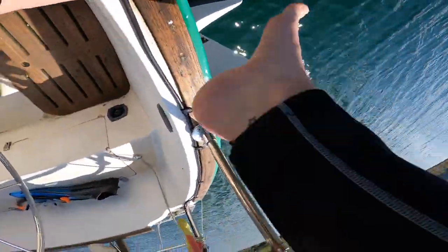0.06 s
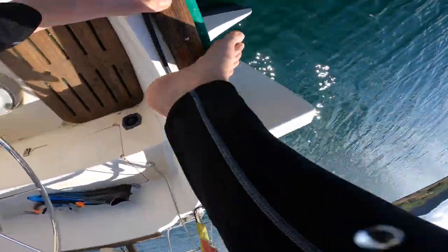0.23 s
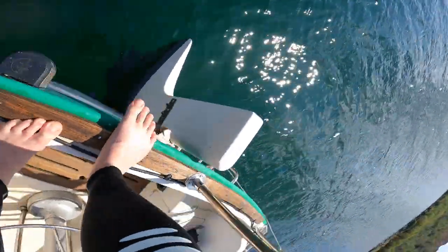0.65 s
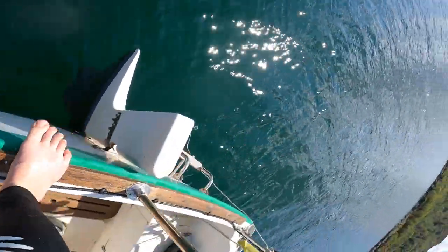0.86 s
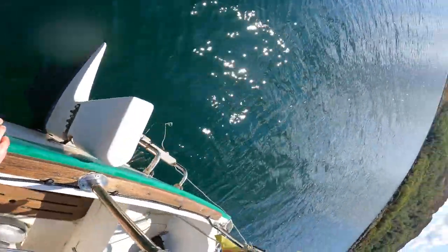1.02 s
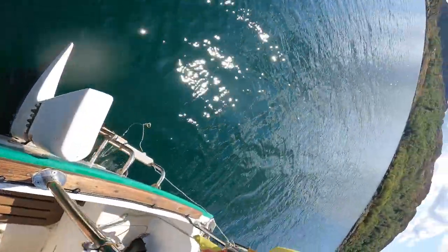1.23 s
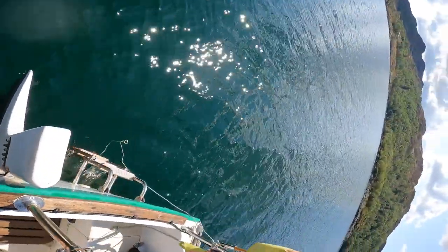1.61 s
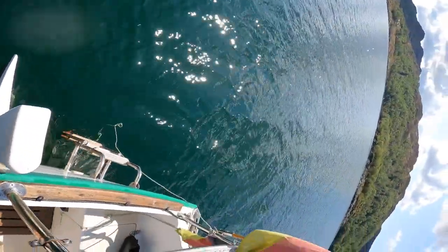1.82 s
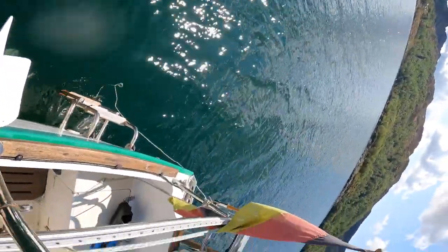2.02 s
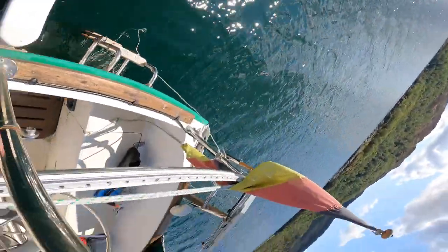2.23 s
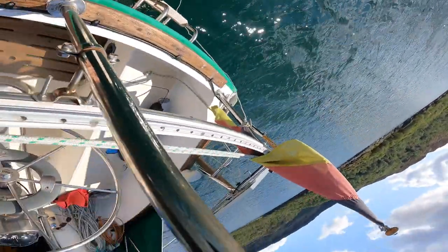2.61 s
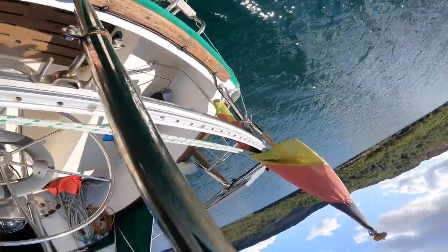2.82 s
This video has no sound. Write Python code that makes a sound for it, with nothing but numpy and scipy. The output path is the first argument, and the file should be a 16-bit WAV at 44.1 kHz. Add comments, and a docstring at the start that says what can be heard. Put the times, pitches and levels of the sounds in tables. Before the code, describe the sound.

Wind buffets the microphone after a bare foot slides and thumps on a sailboat's rail.

```python
"""Something slides with a hiss on the stern of a small sailboat; a bare foot thumps the rail and
judders along it by stick-slip friction. Fittings click and creak under the load, ringing in their
natural modes, and water washes softly along the hull with swells of airy hiss. Then turbulent
gusts buffet the microphone with a low rumble, while small metal hardware rubs and rings thinly."""
import sys
import numpy as np
from scipy import signal
from scipy.fft import rfft, irfft
from scipy.io import wavfile

SR = 44100
rng = np.random.default_rng(int(sys.argv[2]) if len(sys.argv) > 2 else 0)


def generate_wav(sig):
    """Save sig (samples, or channels by samples) to the path in sys.argv[1] as 16-bit PCM at SR."""
    pcm = np.round(np.clip(np.atleast_2d(sig).T, -1, 1) * 32767).astype(np.int16)
    wavfile.write(sys.argv[1], SR, pcm)


N = 130095
T = np.arange(N) / SR


def amp(db):
    """Decibels to amplitude gain."""
    return 10 ** (np.asarray(db) / 20)


def unit(x):
    """Normalisation to an rms of one."""
    return x / np.sqrt(np.mean(x ** 2) + 1e-20)


def curve(points):
    """Linear interpolation of (seconds, value) points over the whole scene."""
    return np.interp(T, *np.transpose(points))


def colour(x, points):
    """Spectral shaping by (Hz, dB) points, to an rms of one."""
    hz, db = np.transpose(points)
    f = np.fft.rfftfreq(x.shape[-1], 1 / SR)
    gain = amp(np.interp(np.log(f + 1), np.log(hz + 1), db))
    return unit(irfft(rfft(x) * gain, x.shape[-1]))


def drift(rate_hz):
    """Random modulation: low-passed noise with an rms of one."""
    f = np.fft.rfftfreq(N, 1 / SR)
    return unit(irfft(rfft(rng.standard_normal(N)) / (1 + (f / rate_hz) ** 4), N))


def stereo_noise(correlation):
    """Sum and difference of two white noises set the correlation of left and right."""
    mid, side = rng.standard_normal((2, N))
    return np.sqrt((1 + correlation) / 2) * mid + np.sqrt((1 - correlation) / 2) * np.array([side, -side])


def pan(db):
    """Channel gains for a left-over-right level difference."""
    return amp([[db / 2], [-db / 2]])


def add(mix, start_s, sound):
    """Superposition of a sound on the mix from a given time."""
    part = mix[:, max(round(start_s * SR), 0):][:, :sound.shape[-1]]
    part += sound[..., :part.shape[-1]]


def ring(modes):
    """Free vibration: damped sines from (Hz, dB, t60) rows; t60 is the time to fall 60 dB."""
    t = T[:SR // 2]
    return sum(amp(db) * np.exp(-np.log(1000) * t / t60) * np.sin(2 * np.pi * hz * t)
               for hz, db, t60 in modes)


def resonate(x, hz, width_hz):
    """Forced vibration of a steep, double-pole resonance, to an rms of one."""
    carrier = np.exp(2j * np.pi * np.cumsum(np.full(len(x), hz)) / SR)
    pole = np.exp(-np.pi * width_hz / SR)
    return unit((carrier * signal.lfilter([1], [1, -2 * pole, pole ** 2], x / carrier)).real)


def micro_slips(n, per_s, spread_db, max_spreads):
    """Rough friction as a Poisson process: impulses of random time, sign and strength."""
    impulses = (rng.random(n) < per_s / SR) * rng.choice([-1, 1], n)
    return impulses * amp(spread_db * np.minimum(rng.exponential(1, n), max_spreads))


# Blows of the foot. Each row: start in seconds, level in dB, pitch in Hz, crack level in dB, pan in dB.
FOOT_BLOWS = [(.226, -17.5, 267, -18.5, -14), (.2335, -4.5, 130, -45, -8), (0.265, -8, 223, -11, 7),
              (0.276, -14, 90, -25.5, 3), (0.3071, -16.5, 204, -13, -14)]
# Spectrum of the contact crack. Each row: frequency in Hz, relative level in dB.
CRACK_SPECTRUM = [(100, -0.5), (400, 0), (880, -7), (1200, -23), (3500, -23.5), (8000, -49.5), (16000, -75)]


def foot_thumps(body_rise_s=0.0029, body_t60_s=0.04, crack_rise_s=0.0011, crack_t60_s=0.013):
    """Soft impact: each blow on the rail excites a low, heavily damped mode under a dull crack."""
    out, t = np.zeros((2, N)), T[:SR // 2]
    for start_s, db, hz, crack_db, pan_db in FOOT_BLOWS:
        body = ring([(hz, db, body_t60_s)]) * (1 - np.exp(-t / body_rise_s))
        envelope = (1 - np.exp(-(t / crack_rise_s) ** 2)) * np.exp(-np.log(1000) * t / crack_t60_s)
        noise = colour(stereo_noise(correlation=0.33), CRACK_SPECTRUM)[:, :len(t)]
        crack = noise * amp(crack_db) * envelope
        add(out, start_s, pan(pan_db) * (crack - body))
    return out


# Modes of the rail. Each row: frequency in Hz, relative level in dB, t60 in seconds.
RAIL_MODES = [(62, 1, 0.043), (137, 3, 0.048), (228, -24, .035), (285, -15.5, 0.025)]


def foot_judder(start_s=0.312, length_s=0.088, slip_s=0.0036, force_db=-13, fade_db=-32.5):
    """Stick-slip friction: quickening, fading slips of soft skin drive the modes of the rail."""
    t = T[:round(length_s * SR)]
    slip_rate_hz = np.minimum(58.7 + 410 * t, 73)
    slips = np.diff(np.floor(np.cumsum(slip_rate_hz) / SR), prepend=-1)
    strength = amp(force_db + fade_db * (t / length_s) ** 2)
    push = np.hanning(round(slip_s * SR))
    force = np.convolve(slips * strength, push / push.sum())
    out = np.zeros((2, N))
    add(out, start_s, -pan(db=-9) * signal.fftconvolve(force, ring(RAIL_MODES)))
    return out


# Wind pressure on the microphone. Each row: time in seconds, level in dB.
GUST_LEVELS = [(0, -50.5), (.3, -40), (.45, -41), (.52, -47), (.78, -48), (.93, -60.5), (1.1, -91),
               (1.2, -61.5), (1.45, -67), (1.55, -62), (1.74, -59), (1.79, -43), (1.86, -43.5),
               (1.98, -46.5), (2.13, -39), (2.21, -45.5), (2.25, -53.5), (2.29, -39.5), (2.35, -49.5),
               (2.4, -31), (2.455, -50), (2.49, -34), (2.58, -33.5), (2.62, -29.5), (2.68, -29.5),
               (2.73, -37.5), (2.77, -44), (2.81, -39), (2.89, -48.5), (2.95, -55)]
# Spectra of the rumble and of the smaller eddies. Each row: frequency in Hz, relative level in dB.
RUMBLE_SPECTRUM = [(10, -3.5), (28, 9), (65, 2), (140, -6), (220, -15), (320, -60.5), (600, -44.5),
                   (1500, -57.5), (4000, -101)]
EDDY_SPECTRUM = [(30, -16.5), (130, 1.5), (230, -4.5), (350, -12.5), (550, -24), (800, -42.5), (2000, -70),
                 (8000, -78)]
# Single hard buffets. Each row: peak time in seconds, level in dB, centre frequency in Hz.
WIND_BUFFETS = [(1.811, -34.5, 55), (1.91, -40, 144), (2.129, -36.5, 102), (2.414, -21, 75.6),
                (2.546, -42, 230), (2.601, -21, 140), (2.6468, -22.5, 175), (2.676, -26.5, 180),
                (2.698, -38, 260), (2.801, -34, 70)]


def wind(eddy_db=-41.5, reference_gust_db=-32.5, eddy_growth=2.2):
    """Turbulent pressure: a lumpy rumble; smaller eddies grow faster with the gust, a few strike singly."""
    gust_db = curve(GUST_LEVELS)
    lumps_db = 2 * drift(rate_hz=64)
    eddy_level_db = eddy_db + eddy_growth * (gust_db - reference_gust_db)
    rumble = colour(stereo_noise(correlation=1), RUMBLE_SPECTRUM) * amp(gust_db + lumps_db - 1.5)
    eddies = colour(stereo_noise(correlation=0.28), EDDY_SPECTRUM) * amp(eddy_level_db + lumps_db)
    pressure = rumble + eddies
    for peak_s, db, hz in WIND_BUFFETS:
        u = np.pi * hz * (T - peak_s)
        pressure += amp(db) * (1 - 2 * u ** 2) * np.exp(-u ** 2)  # a peak between two troughs
    return pan(db=-1.5) * pressure


# Clicks under load. Each row: start in seconds, level in dB, tilt in dB per octave, pan in dB.
FITTING_CLICKS = [(.540, -24, 0, 4), (0.5596, -25, -0.5, 4), (0.6838, -30, -3, 2), (.708, -29.5, -1.5, 2),
                  (0.812, -45, -3, -1), (0.828, -44, -2, -1), (1.207, -53, -2, 0)]
# Modes of the fitting. Each row: frequency in Hz, relative level in dB, t60 in seconds.
FITTING_MODES = [(222, -5.5, .03), (590, -9, 0.014), (942, -3.5, 0.024), (1320, 3, 0.0048),
                 (2680, -3.5, 0.0099), (3360, 1, 0.0031), (4640, 7, 0.0011)]
# Light taps on small hardware. Each row: start in seconds, level in dB, pitch in Hz.
HARDWARE_TAPS = [(0.448, -31, 1975), (1.507, -47, 3350)]
# Modes of a tap. Each row: ratio to the pitch, relative level in dB, t60 in seconds.
TAP_PARTIALS = [(.16, -12.5, 0.045), (1, 1, 0.019), (1.24, -4.5, 0.02), (1.9, -5.5, 0.0064)]


def fittings(rebound_s=0.00214, rebound_db=-11.5, top_hz=6200):
    """Impulse response: modes of alternating sign ring in light taps and in dry clicks that rebound."""
    out = np.zeros((2, N))
    for start_s, db, tilt_db, pan_db in FITTING_CLICKS:
        modes = [(hz, db + mode_db + tilt_db * np.log2(hz / 1000), t60)
                 for hz, mode_db, t60 in FITTING_MODES]
        click = pan(pan_db) * sum((-1) ** k * ring([mode]) for k, mode in enumerate(modes))
        add(out, start_s, click)
        add(out, start_s + rebound_s, -amp(rebound_db) * click)
    for start_s, db, hz in HARDWARE_TAPS:
        modes = [(hz * ratio, db + mode_db, t60) for ratio, mode_db, t60 in TAP_PARTIALS]
        add(out, start_s, sum((-1) ** k * ring([mode]) for k, mode in enumerate(modes)))
    return signal.sosfilt(signal.butter(4, top_hz, fs=SR, output="sos"), out)


# Course of the slide, followed until its fade begins. Each row: time in seconds, relative level in dB.
SLIDE_LEVELS = [(0, -53), (.09, -46.5), (.25, -45.5), (0.343, -45.5), (.39, -56), (.43, -63.5), (.5, -95.5)]
# Spectrum of its hiss. Each row: frequency in Hz, relative level in dB.
SLIDE_SPECTRUM = [(150, -45), (350, -29), (700, -9.5), (880, -13.5), (1030, -1.5), (1250, -5.5),
                  (1700, -2.5), (2500, 0), (3100, -1), (4000, -6.5), (7400, -8.5), (10000, -22),
                  (13000, -30.5), (15500, -38.5)]


def slide(gain_db=4.5, fade_start_s=0.383, fade_db_per_s=54):
    """Sliding friction: a smooth broadband hiss with a fine flutter, ending in an exponential decay."""
    level_db = np.interp(np.minimum(T, fade_start_s), *np.transpose(SLIDE_LEVELS))
    fade_db = fade_db_per_s * np.maximum(T - fade_start_s, 0)
    hiss = colour(stereo_noise(correlation=0.83), SLIDE_SPECTRUM)
    flutter_db = 1.07 * drift(rate_hz=40)
    return pan(db=1.4) * hiss * amp(level_db - fade_db + gain_db + flutter_db)


# Course of the gritty scuff. Each row: time in seconds, level in dB.
SCUFF_LEVELS = [(.5, -78), (.57, -50.5), (.61, -59), (.7, -47.5), (.77, -50.5), (.83, -50), (.88, -57),
                (1.0, -68), (1.25, -110)]
# Resonances it excites. Each row: frequency in Hz, width in Hz, relative level in dB.
SCUFF_RESONANCES = [(244, 220, -5), (698, 120, -0.5), (1050, 300, -1.5), (1670, 600, -4), (3150, 830, 1.5)]


def rail_scuff():
    """Forced resonance: dense tiny slips ring the rail and its fittings."""
    slips = micro_slips(N, per_s=2500, spread_db=4.5, max_spreads=4)
    creak = sum(amp(db) * resonate(slips, hz, width_hz) for hz, width_hz, db in SCUFF_RESONANCES)
    return unit(creak) * amp(curve(SCUFF_LEVELS))


# Rubs on small metal hardware. Each row: start and length in seconds, grit and ring gains in dB.
METAL_RUBS = [(.88, 0.03, -61, -59), (1.167, 0.043, -76, -60), (1.49, 0.036, -76, -63.5),
              (1.799, 0.05, -61, -68.5), (2.111, 0.01, -57.5, -63), (2.133, 0.028, -56, -51.5),
              (2.408, .004, -61.5, -64), (2.449, .003, -60.5, -66), (2.46, 0.039, -59.5, -50),
              (2.597, 0.013, -63.5, -65), (2.64, 0.0075, -66, -55), (2.787, 0.02, -55, -52.5),
              (2.812, 0.0046, -48, -41.5)]
# Spectrum of the grit. Each row: frequency in Hz, relative level in dB.
GRIT_SPECTRUM = [(300, -15), (800, 4), (1500, 8), (2800, 3.5), (4300, -14.5), (6000, -20.5), (7700, 8.5),
                 (10000, -20), (15000, -27)]
# Modes of the metal. Each row: frequency in Hz, relative level in dB, t60 in seconds.
METAL_MODES = [(6490, -6, 0.49), (6440, -8, .36), (6480, -1, 0.19), (6510, -2, .15), (6634, 0.5, 0.095),
               (6850, -4, .035), (7030, -6.5, 0.22), (7100, -3, 0.031), (8030, -2, .008)]


def metal_rubs(swell_db=6.5, release_s=0.009):
    """Frictional excitation: grit builds, lets go, and leaves a cluster of high metal modes ringing."""
    out, t = np.zeros((2, N)), T[:SR // 2]
    metal = ring(METAL_MODES)
    metal /= np.linalg.norm(metal)
    for start_s, length_s, grit_db, ring_db in METAL_RUBS:
        slips = micro_slips(len(t), per_s=3000, spread_db=1, max_spreads=3)
        progress = np.minimum(t / length_s, 1)
        release = np.exp(-np.maximum(t - length_s, 0) / release_s)
        force = amp(swell_db * (progress - 2)) * release
        add(out, start_s, amp(grit_db) * force * colour(slips, GRIT_SPECTRUM))
        add(out, start_s, amp(ring_db) * signal.fftconvolve(force * unit(slips), metal))
    return out


# Water along the hull. Each row: time in seconds, level in dB.
WASH_LEVELS = [(0, -71), (.5, -64), (.7, -53), (.93, -59), (1.2, -62), (1.42, -68), (1.75, -75),
               (2.0, -74.5), (2.3, -77), (2.75, -76), (2.95, -69.5)]
# Spectrum of the wash. Each row: frequency in Hz, relative level in dB.
WASH_SPECTRUM = [(100, -16), (200, -6.5), (350, 1), (460, -3.5), (620, -9), (900, -17.5), (1350, -8.5),
                 (2500, -13.5), (4000, -20.5), (6600, -18), (10400, -32.5), (13600, -35), (15500, -49.5)]


def hull_wash():
    """Amplitude-modulated noise: a soft wash of water whose level ripples slightly."""
    wash = colour(stereo_noise(correlation=1), WASH_SPECTRUM)
    ripple_db = 0.93 * drift(rate_hz=13)
    return wash * amp(curve(WASH_LEVELS) + ripple_db)


# Swells of airy hiss. Each row: peak time in seconds, level in dB, rise and fall in seconds.
HISS_SWELLS = [(1.51, -64, 0.04, 0.037), (1.645, -62, 0.075, 0.05), (1.84, -70.5, 0.052, 0.13),
               (2.02, -74.5, 0.017, 0.044), (2.155, -71.5, 0.035, 0.034), (2.489, -72.5, 0.036, 0.018),
               (2.94, -81, 0.086, .05)]
# Spectrum of the swells. Each row: frequency in Hz, relative level in dB.
HISS_SPECTRUM = [(300, -26), (800, -7.5), (1250, 4), (3000, 2.5), (5000, -4.5), (7500, -6.5),
                 (10500, -19.5), (13500, -21), (16000, -26)]


def airy_hiss():
    """Incoherent addition: bell-shaped swells of hiss come and go, summing in power."""
    power = sum(amp(db) ** 2 * np.exp(-((T - peak_s) / np.where(T < peak_s, rise_s, fall_s)) ** 2)
                for peak_s, db, rise_s, fall_s in HISS_SWELLS)
    hiss = colour(stereo_noise(correlation=1), HISS_SPECTRUM)
    flicker_db = 0.9 * drift(rate_hz=160)
    return hiss * np.sqrt(power) * amp(flicker_db)


def scene():
    """Linear superposition of deck sounds, water and wind."""
    deck = foot_thumps() + foot_judder() + fittings() + slide() + rail_scuff()
    return deck + hull_wash() + airy_hiss() + wind() + metal_rubs()


def record(dry, low_cut_hz=14, high_cut_hz=15550):
    """Band limiting: a gentle high-pass and a steep low-pass."""
    high_passed = signal.sosfilt(signal.butter(1, low_cut_hz, "high", fs=SR, output="sos"), dry)
    low_pass = signal.firwin(511, high_cut_hz, window=("kaiser", 9), fs=SR)
    return signal.oaconvolve(high_passed, low_pass[None], "same")


dry = scene()
out = record(dry)
generate_wav(out)
```